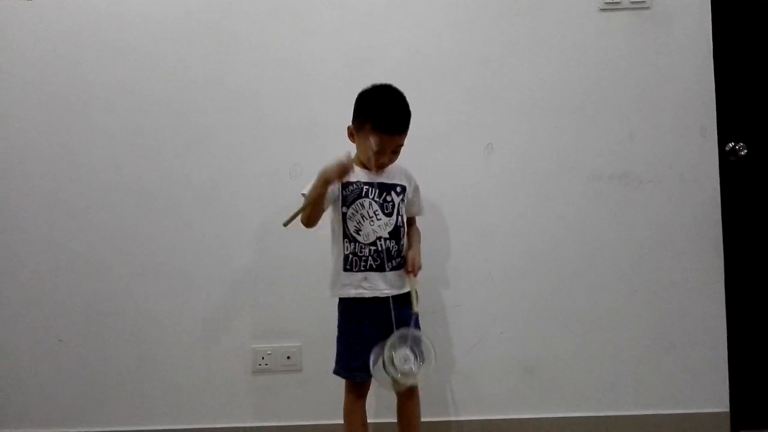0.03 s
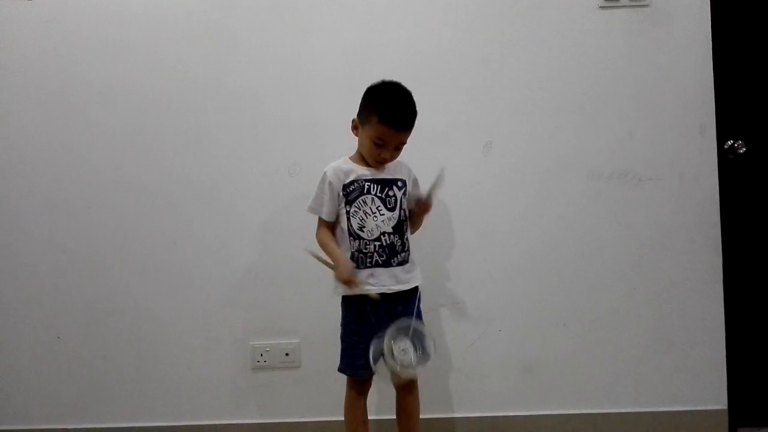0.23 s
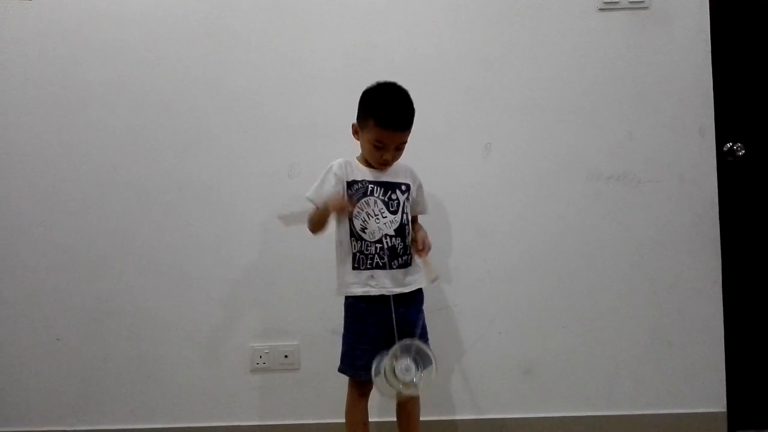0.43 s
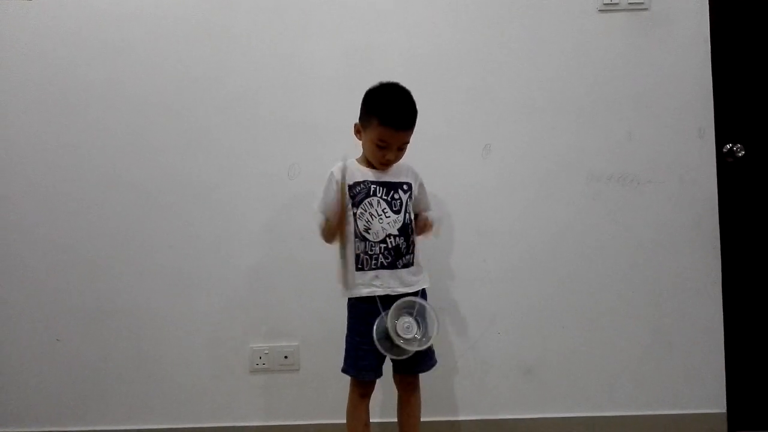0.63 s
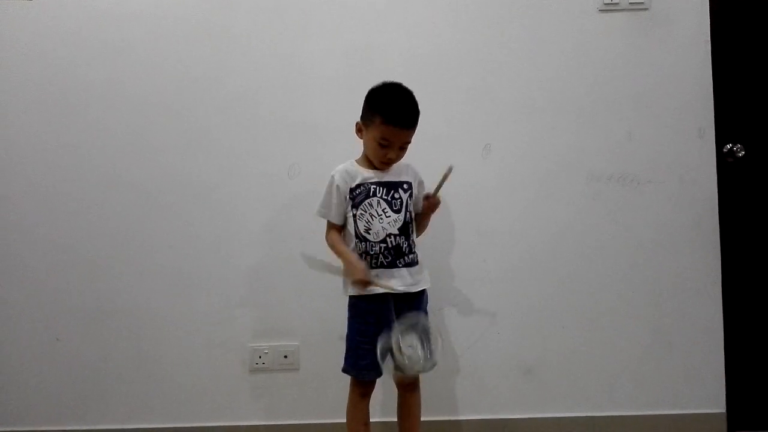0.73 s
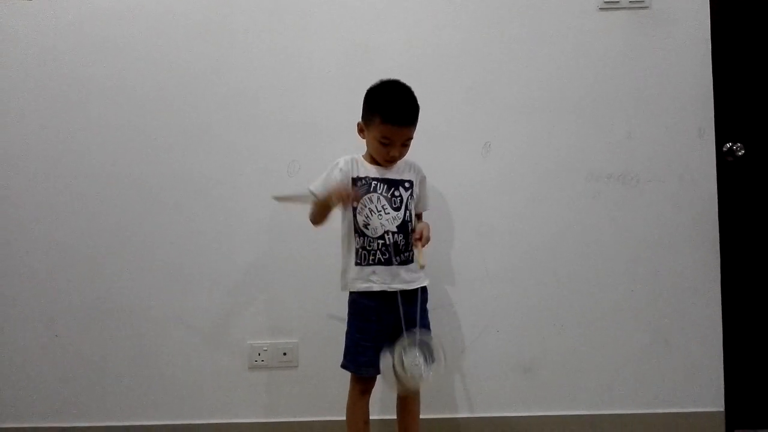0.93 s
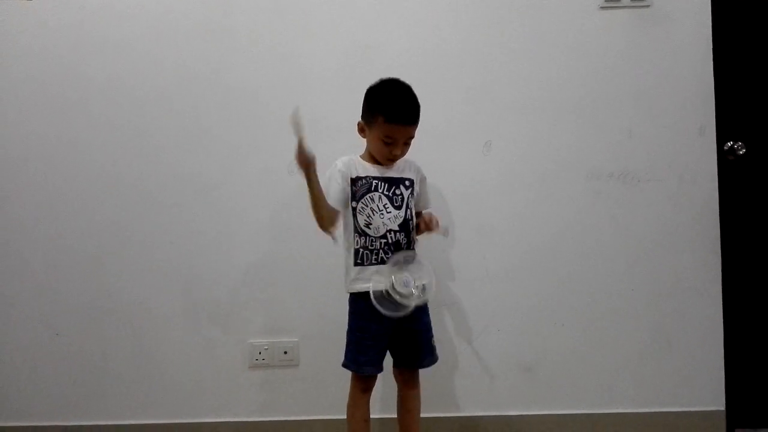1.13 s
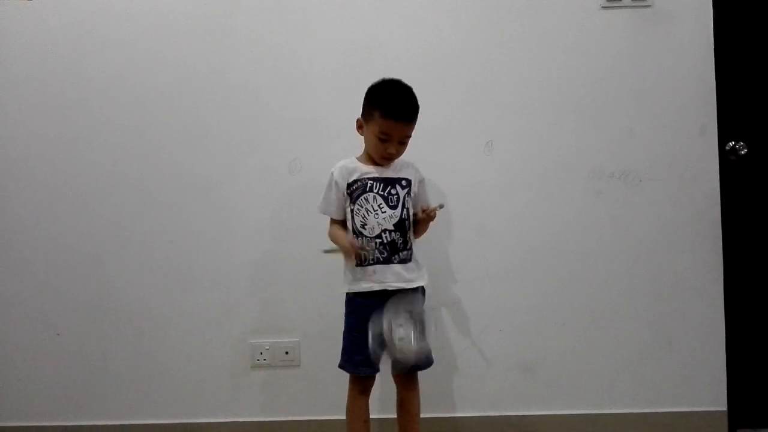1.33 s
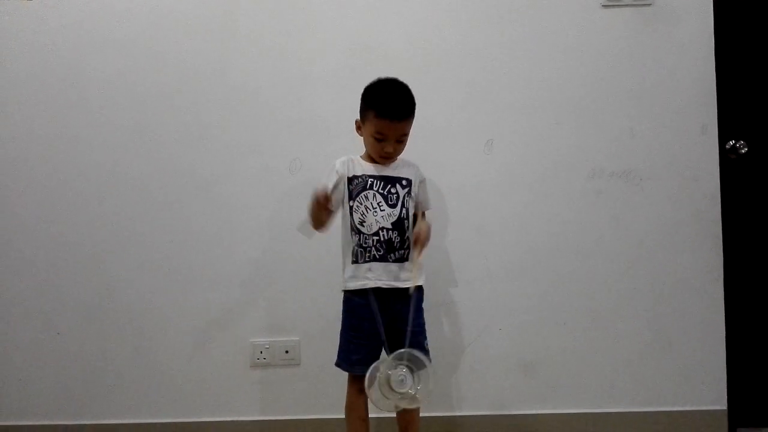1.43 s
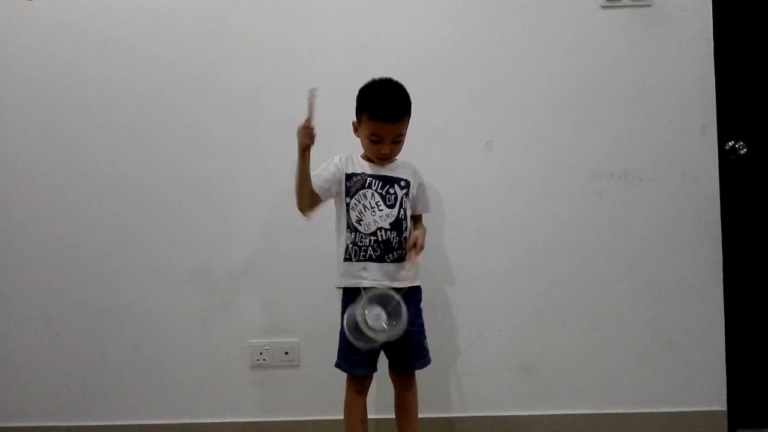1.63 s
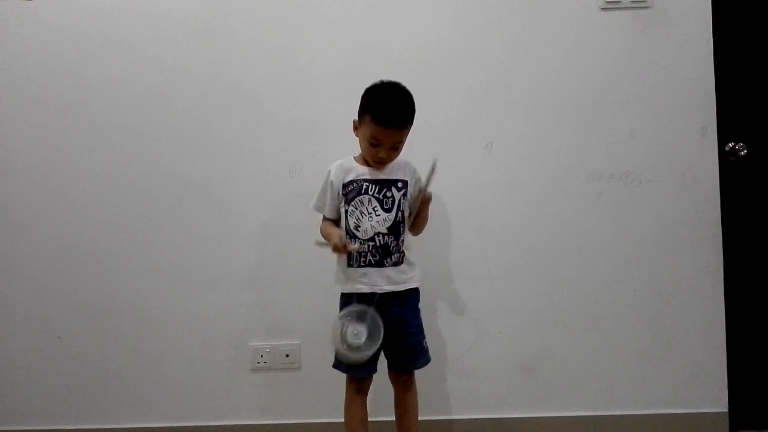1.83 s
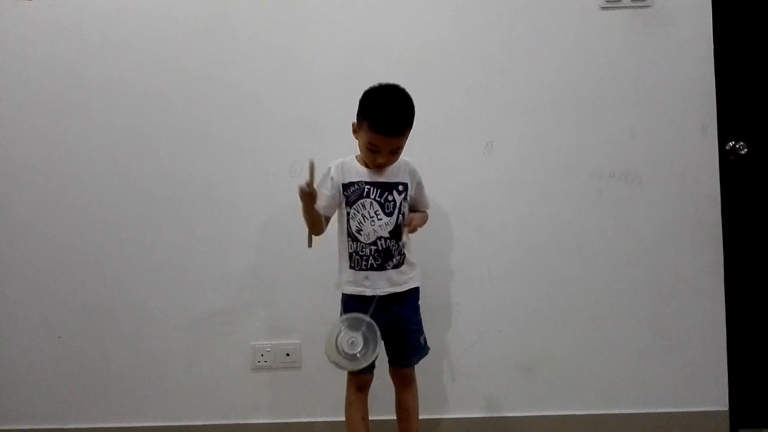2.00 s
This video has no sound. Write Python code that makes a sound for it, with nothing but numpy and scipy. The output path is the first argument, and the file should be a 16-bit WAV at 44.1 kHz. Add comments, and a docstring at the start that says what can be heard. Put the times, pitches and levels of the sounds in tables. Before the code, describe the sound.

A diabolo is spun on its string in a bare, echoing room: three raspy rushing pulls half a second apart, softer hisses between, then a hard chattering stick clack; air bumps the microphones.

```python
"""A rubbing, rasping rush is already under way as a diabolo is spun up on its string in a bare, hard-walled room.
Each pull makes the string bite on the axle, rush round it and sound the plastic cups: filtered random slips.
The slack string hisses back between pulls, and short chirps are unsteady tones. A hand stick clacks hard and
chatters once: filtered clicks that ring stick and cups. A draught of low noise and pressure bumps buffets the
microphones, over steady room noise and a faint electrical ticking in the left channel."""
import sys
import numpy as np
from scipy.fft import rfft, irfft, next_fast_len
from scipy.io import wavfile
from scipy.ndimage import uniform_filter1d, map_coordinates

SR = 44100
rng = np.random.default_rng(int(sys.argv[2]) if len(sys.argv) > 2 else 0)


def unload_audio(sound):
    """Save the sound as a 16-bit wav file, at the path given as the first command line argument."""
    columns = np.transpose(np.atleast_2d(sound))
    # keep every value between -1 and 1, then stretch to whole-number steps
    steps = np.round(np.clip(columns, -1, 1) * 32767)
    wavfile.write(sys.argv[1], SR, steps.astype(np.int16))


N = 91066
T = np.arange(N) / SR   # time in seconds
SIZE = next_fast_len(2 * N)   # room for a filter to ring on without wrapping round
HZ = np.maximum(np.arange(SIZE // 2 + 1) * SR / SIZE, 1)   # frequency of each spectrum bin

# The driving pulls. Each row: start in seconds, length factor, then bite, rush, cup and rasp levels in dB.
PULL_ROWS = [(-0.095, 1.14, -49.5, -44.5, -50.5, -47), (0.403, 0.91, -50.5, -46, -52, -47.5),
             (0.899, 0.98, -52, -49, -58.5, -47), (1.936, 0.48, -69, -75, -89, -69)]
# Resonances of the plastic cups. Each row: frequency in Hz, width in Hz, level in dB.
CUP_RESONANCES = [(960, 103, -3), (1021, 128, -3), (1066, 140, -8)]
RUB_DIRECT_DB = 1   # direct sound of the rubbing string, beside its room sound


def from_db(db):
    """Decibels to gain."""
    return 10 ** (np.asarray(db) / 20)


def rms_one(x):
    """Scale to unit power."""
    return x / np.sqrt(np.mean(x ** 2) + 1e-20)


def at_hz(points, hz=HZ):
    """Read values between the points of a table, on a log-frequency axis."""
    point_hz, values = np.transpose(points)
    return np.interp(np.log(hz), np.log(point_hz), values)


def filtered(x, response):
    """Pass a signal through a frequency response."""
    return irfft(rfft(x, SIZE) * response, SIZE)[..., :N]


def colour(db):
    """Frequency response with the given gains in dB that never sounds before its input."""
    cepstrum = irfft(db * np.log(10) / 20, SIZE)
    # Folding the later half onto the earlier half keeps the gains but delays each frequency as little as possible.
    cepstrum[1:SIZE // 2] *= 2
    cepstrum[SIZE // 2 + 1:] = 0
    return np.exp(rfft(cepstrum))


def resonances(rows):
    """Side-by-side resonances, each squared for steep skirts."""
    total = 0
    for hz, width, db in rows:
        detuning = HZ / hz - hz / HZ
        total = total + from_db(db) / (1 + 1j * hz / (2 * width) * detuning) ** 2
    return total


def swell(start, attack, hold, release):
    """Smooth attack, hold and release."""
    rise = (T - start) / attack
    fall = (start + attack + hold + release - T) / release
    return np.sin(np.pi / 2 * np.clip(np.minimum(rise, fall), 0, 1)) ** 2


def slow(rate_hz):
    """Random drift with a spread of one: noise that weakens above the given rate."""
    return rms_one(filtered(rng.standard_normal(N), 1 / (1 + (HZ / rate_hz) ** 2)))


def bent(x, speed):
    """Bend the pitch of a signal by reading it at a changing speed."""
    return map_coordinates(x, [np.cumsum(speed)], order=3, mode="mirror")


def diffuse(pair):
    """Mix two unrelated signals into sound from all sides, partly alike at the two microphones."""
    # Left-right likeness. Each row: frequency in Hz, likeness from -1 (opposite) to 1 (the same).
    likeness = [(100, 1), (350, 0.78), (800, 0.34), (1500, 0.43), (3000, -0.33), (5000, 0.92),
                (12000, -0.19)]
    alike = np.clip(at_hz(likeness), -1, 1)
    shared = filtered(pair[0], np.sqrt(1 + alike))
    opposed = filtered(pair[1], np.sqrt(1 - alike)) * [[1], [-1]]
    return shared + opposed


def room(x, direct_db, wet_db=0):
    """Direct sound, early wall echoes and a tail whose die-away time depends on frequency."""
    # How long the tail rings. Each row: frequency in Hz, time to fall by 60 dB in seconds.
    decay_times = [(300, 0.41), (1000, 0.55), (2700, 0.53), (9000, 0.42)]
    build_s, direct_lag_s = 0.006, .00006   # growth of the tail; lateness of the direct sound on the right
    echoes_per_s, echo_db, echo_fade_s = 3500, -3, 0.003   # average echo rate, level against the tail, fade

    age, hz = T[:SR], np.maximum(np.arange(SR // 2 + 1), 1)
    white, tail = rfft(rng.standard_normal((2, SR))), 0
    for band_hz, t60 in decay_times:
        share = at_hz([(f, float(f == band_hz)) for f, _ in decay_times], hz)
        tail = tail + irfft(white * share) * from_db(-60 * age / t60)
    tail = rms_one(tail * (1 - np.exp(-age / build_s)))

    echo_sizes = rng.standard_normal((2, SR))
    echo_present = rng.random((2, SR)) < echoes_per_s / SR
    echoes = rms_one(echo_sizes * echo_present * np.exp(-age / echo_fade_s))

    walls = diffuse(tail + from_db(echo_db) * echoes) / np.sqrt(SR)
    direct = np.exp(-2j * np.pi * HZ * direct_lag_s * [[0], [1]])
    return filtered(x, from_db(direct_db) * direct + from_db(wet_db) * rfft(walls, SIZE))


def friction(response):
    """Dense tiny slips of the fibres, fluttering as the spool wobbles, heard through a response."""
    slips_per_s, slip_spread_db = 7000, 7   # average rate; scale of the random slip sizes
    flutter_hz, flutter_db = 44.3, -1.5
    slip_db = slip_spread_db * np.minimum(rng.exponential(1, N), 4)
    sizes = from_db(slip_db + flutter_db * slow(flutter_hz)) * rng.choice([-1, 1], N)
    slips = sizes * (rng.random(N) < slips_per_s / SR)
    return rms_one(filtered(slips, response))


def pulls():
    """Each pull bites on the axle, rushes round it and sounds the cups; each part has its own path in the room."""
    # Timing of the bite before the pull's length factor: delay, attack, hold and release in seconds.
    bite_shape = (0.0013, 0.026, 0.1, 0.057)
    # Timing of the rush, likewise: delay, attack, hold and release in seconds.
    rush_shape = (0.0072, 0.094, 0.035, 0.091)
    # Timing of the cups, likewise: delay, attack, hold and release in seconds.
    cup_shape = (0.0088, 0.055, 0.11, 0.056)
    # String gripping the axle. Each row: frequency in Hz, width in Hz, level in dB.
    bite_resonances = [(3000, 770, 0)]
    # String running fast round the axle. Each row: frequency in Hz, density in dB per Hz.
    rush_colour = [(200, -45), (450, -10.5), (690, -22), (900, -2), (1400, -2), (1900, -0.5), (2600, -1.5),
                   (3800, -1), (5300, -3.5), (6300, -13.5), (7600, -26), (10500, -29), (14000, -52)]

    stages = [
        (bite_shape, resonances(bite_resonances)),
        (rush_shape, colour(at_hz(rush_colour))),
        (cup_shape, resonances(CUP_RESONANCES)),
    ]
    out = 0
    for k, (shape, response) in enumerate(stages):
        delay, *lengths = shape
        effort = 0
        for start, stretch, *levels_db in PULL_ROWS:
            envelope = swell(start + stretch * delay, *stretch * np.array(lengths))
            effort = effort + from_db(levels_db[k]) * envelope
        out = out + room(friction(response) * effort, RUB_DIRECT_DB)
    return out


def rasps():
    """At the height of a pull the taut string judders on the axle and its pitch sinks."""
    # The rasp before its pitch sinks. Each row: frequency in Hz, width in Hz, level in dB.
    rasp_resonance = [(2337, 244, 0)]
    # Timing before the pull's length factor: delay, attack, hold and release in seconds.
    rasp_shape = (0.014, 0.027, .055, 0.032)
    sag_per_s = 0.393   # share of the pitch lost per second
    judder_hz, judder_db = 106, -1.5
    out = 0
    for start, stretch, *_, db in PULL_ROWS:
        delay, *lengths = stretch * np.array(rasp_shape)
        speed = 1 - sag_per_s * np.clip(T - start - delay, 0, sum(lengths))
        judder = rms_one(from_db(judder_db * slow(judder_hz)))
        rub = bent(friction(resonances(rasp_resonance)), speed)
        out = out + from_db(db) * swell(start + delay, *lengths) * judder * rub
    return room(out, RUB_DIRECT_DB)


def coasting():
    """The loose string rubs a few wavering notes out of the spinning spool."""
    # When the spool coasts: start, attack, hold and release in seconds.
    coast_times = (1.06, .035, .035, .07)
    # The notes before they waver. Each row: frequency in Hz, width in Hz, level in dB.
    note_rows = [(1063, 60, -65), (2260, 150, -66), (2910, 75, -57.5), (3660, 60, -71)]
    waver_hz, waver_share = 22, .025   # rate and typical depth of the pitch drift
    notes = 0
    for hz, width, db in note_rows:
        notes = notes + from_db(db) * friction(resonances([(hz, width, 0)]))
    speed = 1 + waver_share * slow(waver_hz)
    return room(bent(notes, speed) * swell(*coast_times), RUB_DIRECT_DB)


def returns():
    """The slack string slides back, brighter as it gathers speed; a last swing of the spool hisses faintly."""
    # Slack string sliding back. Each row: frequency in Hz, density in dB per Hz.
    slide_colour = [(500, -37.5), (1000, -6.5), (1500, -32), (2100, -12), (2700, 0), (3800, 2), (4700, -5),
                    (6000, -27), (10000, -53)]
    # Fine hiss that grows with speed. Each row: frequency in Hz, density in dB per Hz.
    sizzle_colour = [(2000, -17.5), (4200, -3), (6500, -6), (8000, -17), (14000, -36)]
    # Airy hiss as the spool swings across. Each row: frequency in Hz, density in dB per Hz.
    brush_colour = [(500, -18), (950, 12), (1500, -22), (5000, 3), (11500, 3), (14000, -26.5)]
    # When that airy hiss sounds: start, attack, hold and release in seconds.
    brush_times = (1.82, .05, .15, .06)
    # Return strokes. Each row: start, attack, hold and release in seconds, level in dB.
    strokes = [(0.122, 0.032, 0.13, 0.19, -51.5), (0.633, 0.026, 0.064, 0.11, -53),
               (1.66, 0.069, 0.083, 0.079, -64.5)]
    sizzle_db, sizzle_growth, brush_db = 1.5, 1.72, -71.5   # the growth is a power of the speed

    slide, sizzle = friction(colour(at_hz(slide_colour))), friction(colour(at_hz(sizzle_colour)))
    out = friction(colour(at_hz(brush_colour))) * from_db(brush_db) * swell(*brush_times)
    for start, attack, hold, release, db in strokes:
        speed = np.clip((T - start) / (attack + hold + release), 1e-6, 1)
        rub = slide + from_db(sizzle_db) * speed ** sizzle_growth * sizzle
        out = out + from_db(db) * swell(start, attack, hold, release) * rub
    return room(out, RUB_DIRECT_DB)


def knocks():
    """A sharp crack, duller for a soft contact, rings the stick and the cups; a slap returns from the far wall."""
    # Knocks of stick and spool. Each row: time in seconds, level in dB, cup ring in dB,
    # brightness of the contact in Hz, room level in dB.
    knock_rows = [(0.3854, 4, 0.5, 8000, -6), (1.3794, 16.5, -5.5, 4760, 0), (1.3819, 11, -3.5, 12000, 2.5),
                  (1.3846, 10.5, -3.5, 11200, 0), (1.9328, 3, -7.5, 3630, -10)]
    # Colour of the crack. Each row: frequency in Hz, gain in dB.
    crack_colour = [(200, -43.5), (720, -32.5), (1040, -12.5), (1350, -17), (1900, -14), (2800, -2.5),
                    (3400, -10), (4000, -8.5), (5300, -9.5), (6300, -20), (8600, -23), (12400, -45.5),
                    (13600, -60)]
    # Ringing modes of the stick. Each row: frequency in Hz, level in dB, time to fall by 60 dB in seconds.
    stick_modes = [(3720, -48, 0.051), (4010, -52.5, 0.035)]
    direct_db = -7
    wall_s, wall_db, wall_hz = .0328, -14, 3500   # delay, level and treble limit of the dull slap

    ring = 0
    for hz, db, t60 in stick_modes:
        ring = ring + from_db(db - 60 * T / t60) * np.sin(2 * np.pi * hz * T)
    stick = colour(at_hz(crack_colour)) + rfft(ring, SIZE)
    cups = resonances(CUP_RESONANCES)
    wall_delay = np.exp(-2j * np.pi * HZ * wall_s)
    slap = from_db(wall_db) * wall_delay / (1 + 1j * HZ / wall_hz - (HZ / wall_hz) ** 2)

    out = 0
    for start, db, cup_db, bright_hz, wet_db in knock_rows:
        touch = 1. * (np.arange(N) == int(start * SR))   # a single-sample click
        contact = 1 / (1 + np.sqrt(2) * 1j * HZ / bright_hz - (HZ / bright_hz) ** 2)
        blow = filtered(touch, contact * (from_db(db) * stick + from_db(cup_db) * cups))
        out = out + room(blow, direct_db, wet_db) + filtered(blow, slap)
    return out


def chirps():
    """The string catches for a few milliseconds and chirps: stick-slip at an unsteady pitch."""
    # Each row: time of the peak in seconds, middle frequency in Hz, level in dB.
    chirp_rows = [(0.3806, 3500, -24), (0.4215, 3373, -33.5), (0.434, 3000, -36), (0.882, 3210, -49)]
    half_length_s, waver_hz = 0.0026, 279   # time from peak to half height; typical pitch error
    waver = waver_hz * rms_one(uniform_filter1d(rng.standard_normal(N), size=40))
    out = 0
    for peak, hz, db in chirp_rows:
        tone = np.sin(2 * np.pi * np.cumsum(hz + waver) / SR)
        out = out + from_db(db) / (1 + ((T - peak) / half_length_s) ** 4) * tone
    return out


def draught():
    """Lumpy low pressure and gusts of sharp alternating eddies pass one microphone, then the other."""
    # Strength of the draught. Each row: time in seconds, level in dB.
    strength = [(0, -59), (.21, -61.5), (.25, -43.5), (.36, -45), (.39, -56), (.44, -42), (.59, -60),
                (.65, -43.5), (.81, -49.5), (.89, -58), (.99, -64), (1.1, -38.5), (1.26, -52), (1.34, -44),
                (1.69, -40.5), (1.8, -50), (1.89, -42.5), (2.06, -54.5)]
    # Colour of the lumpy pressure. Each row: frequency in Hz, gain in dB.
    lump_colour = [(15, -2), (55, -3), (120, -9.5), (240, -32.5), (400, -43), (900, -69)]
    # Gusts. Each row: start in seconds, level in dB, fade in seconds.
    gusts = [(0.727, -34.5, 0.0033), (1.0122, -21.5, 0.04), (1.753, -37, 0.0056)]
    # Fine turbulence inside a gust. Each row: frequency in Hz, density in dB per Hz.
    churn_colour = [(60, -30), (130, 5.5), (200, -4), (300, -14.5), (420, -20), (800, -62)]
    apart_db, churn_db, lag_s = -26, -17, .00075   # left-right difference, turbulence, lateness on the right
    eddy_hz, eddy_width_s = 34, .0026   # up-and-down pairs per second; width of one pressure bump

    lumps = filtered(rng.standard_normal((2, N)), from_db(at_hz(lump_colour)))
    both, apart = rms_one(lumps)
    air = both + from_db(apart_db) * apart * [[1], [-1]]
    air = air * from_db(np.interp(T, *np.transpose(strength)))
    churn = from_db(churn_db) * rms_one(filtered(rng.standard_normal(N), from_db(at_hz(churn_colour))))
    ages = np.arange(8) / (2 * eddy_hz)
    for start, db, fade in gusts:
        eddies = 0
        for k, age in enumerate(ages):
            bump = 1 / (1 + .5 * ((T - start - age) / eddy_width_s) ** 2) ** 2
            eddies = eddies + (-1) ** k * np.exp(-age / fade) * bump
        churn_shape = np.exp(np.minimum((T - start) / eddy_width_s, (start - T) / fade))
        air = air + from_db(db) * (eddies + churn * churn_shape)
    return filtered(air, np.exp(-2j * np.pi * HZ * lag_s * [[0], [1]]))


def room_tone():
    """Steady noise of the room, arriving from all sides."""
    # Each row: frequency in Hz, density in dB per Hz.
    floor_colour = [(30, 16.5), (150, -7.5), (300, -2.5), (520, -17), (950, -6), (1500, -14.5), (3000, -15),
                    (5200, -13.5), (7000, -30), (10000, -30.5), (14000, -40)]
    noise = diffuse(rng.standard_normal((2, N)))
    return from_db(-54) * rms_one(filtered(noise, from_db(at_hz(floor_colour))))


def ticking():
    """Thin electrical ticks at the mains rate, left only: short bursts of a high tone."""
    tick_hz, start_s = 50, .01
    ring_hz, width_s, tick_db = 5000, 0.00041, -43.5
    # Time from the nearest tick, negative just before it.
    age = ((T - start_s) * tick_hz + .5) % 1 / tick_hz - .5 / tick_hz
    burst = np.exp(-.5 * (age / width_s) ** 2) * np.sin(2 * np.pi * ring_hz * age)
    return from_db(tick_db) * burst * [[1], [0]]


def scene():
    """The toy in the room, heard by two unlike microphones, with draught and ticking added."""
    # Microphone difference. Each row: frequency in Hz, left minus right in dB.
    ear_difference = [(700, 1.5), (2150, -1.5), (2700, -8), (3700, -5), (4600, 1.5), (5900, 8), (9000, 4),
                      (13600, 4)]
    toy = pulls() + rasps() + coasting() + returns() + knocks()
    toy = toy + room(chirps(), 0, -10.5)
    floor = room_tone()
    ears = np.array([colour(side * at_hz(ear_difference) / 2) for side in (1, -1)])
    return filtered(toy + floor, ears) + draught() + ticking()


def record(dry):
    """The top is cut steeply."""
    cutoff_hz = 14250
    return filtered(dry, 1 / np.sqrt(1 + (HZ / cutoff_hz) ** 200))


dry = scene()
out = record(dry)
unload_audio(out)
```